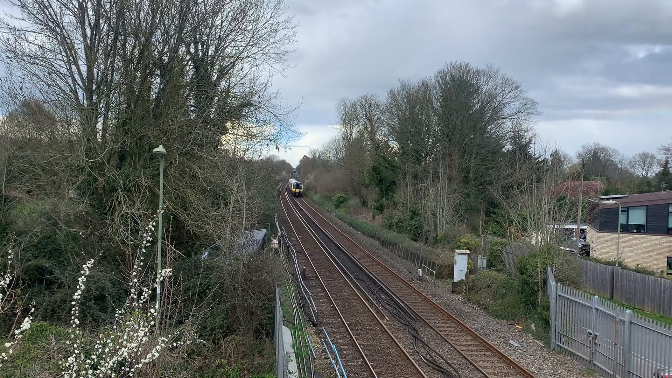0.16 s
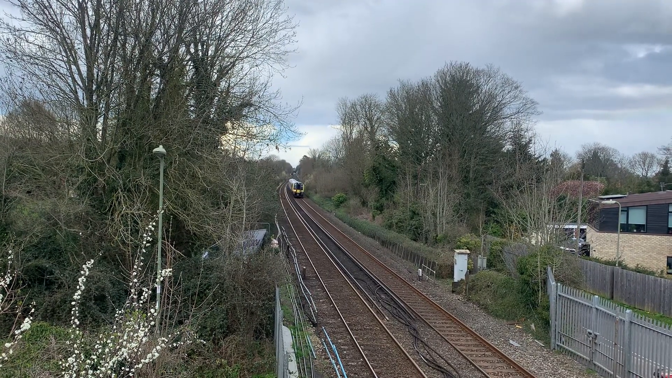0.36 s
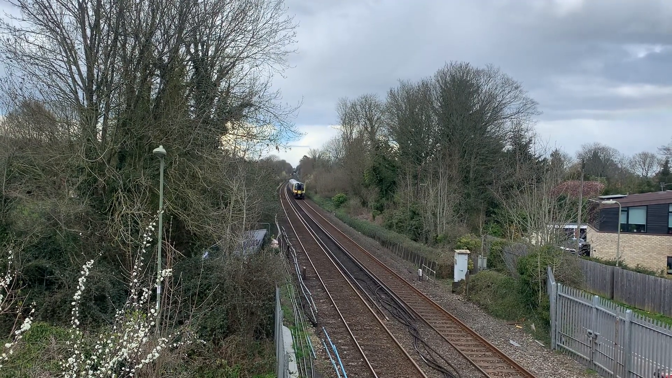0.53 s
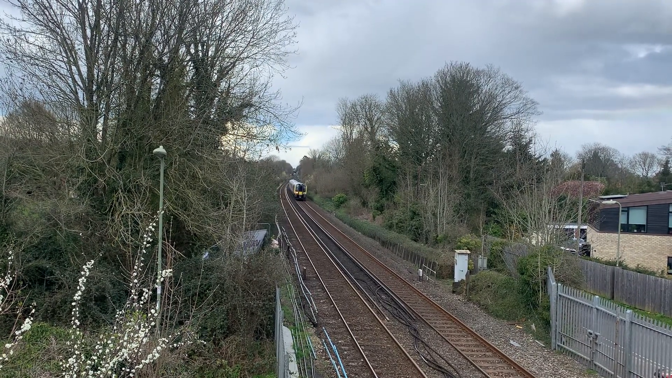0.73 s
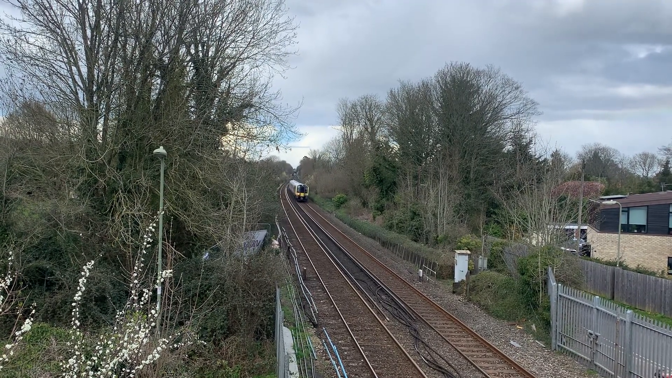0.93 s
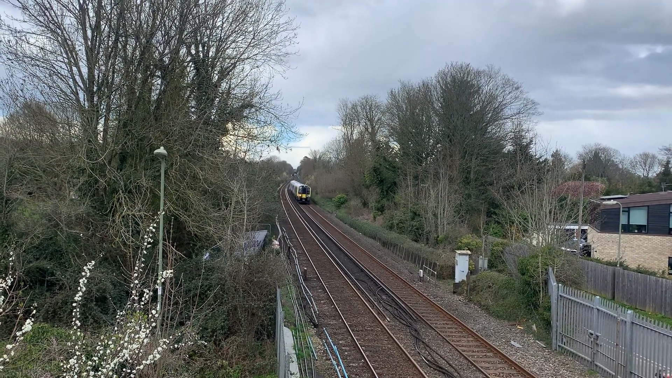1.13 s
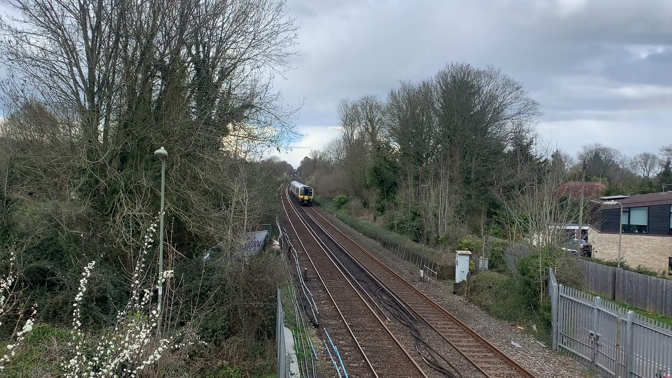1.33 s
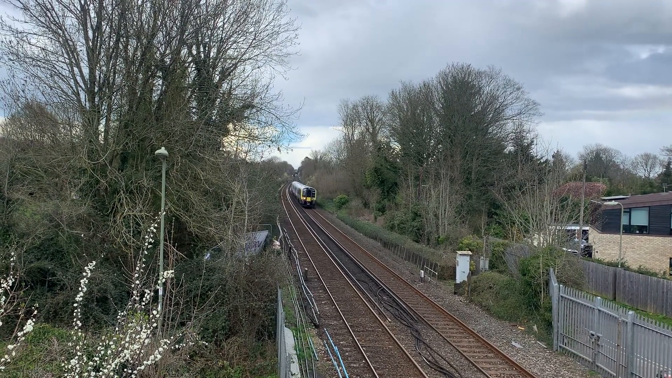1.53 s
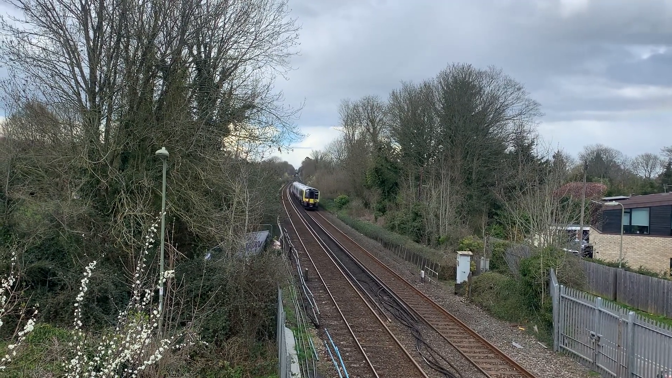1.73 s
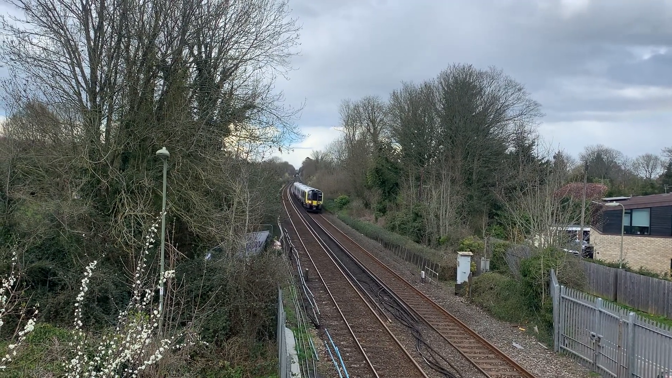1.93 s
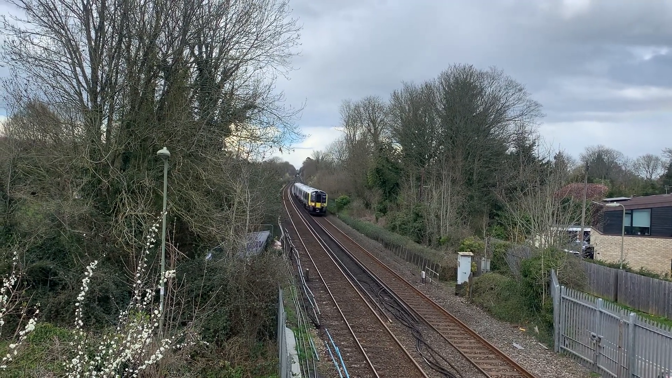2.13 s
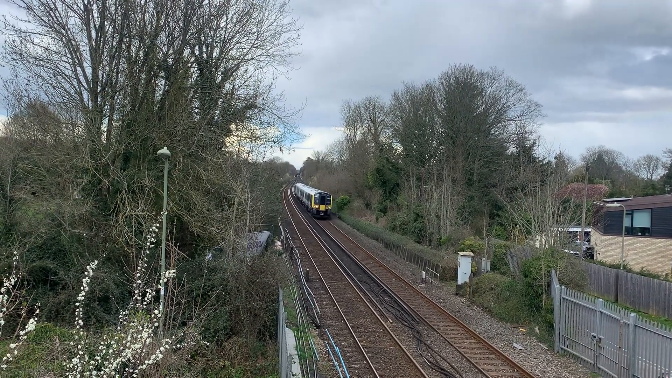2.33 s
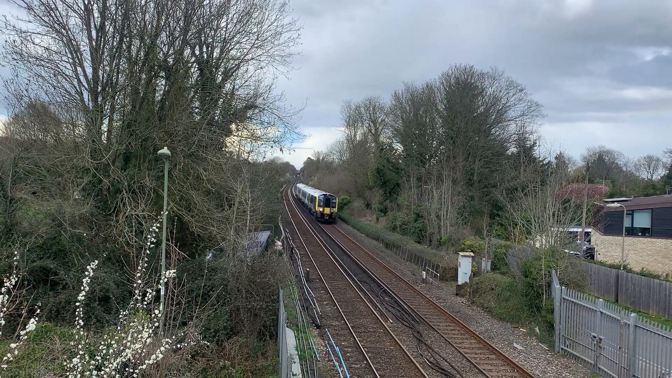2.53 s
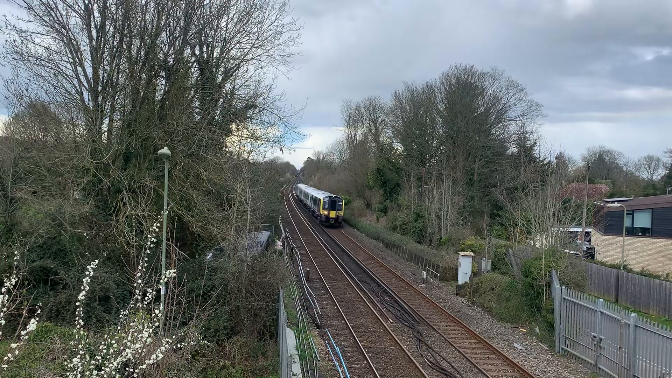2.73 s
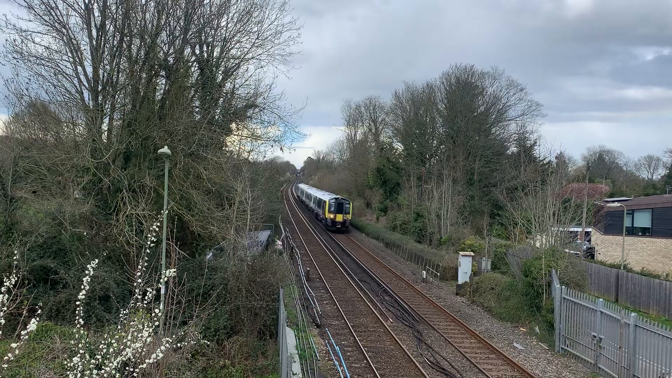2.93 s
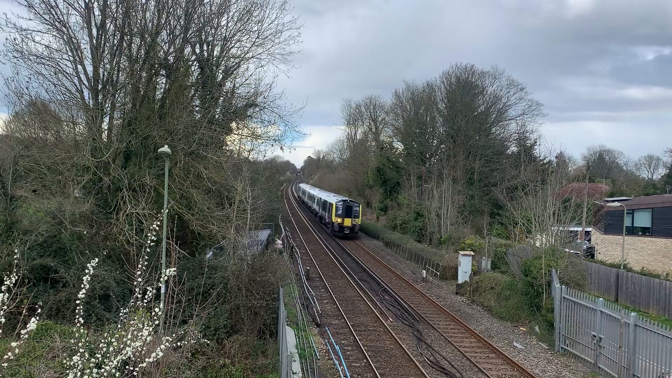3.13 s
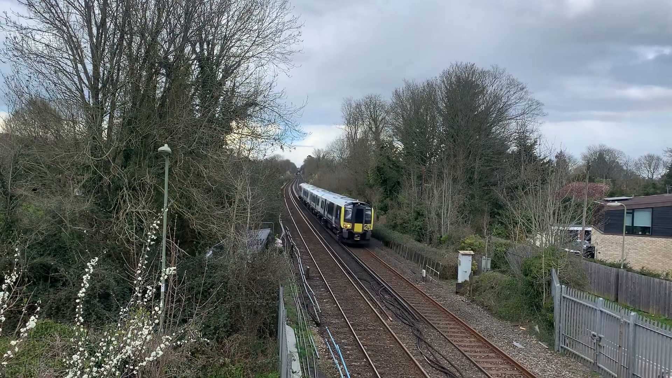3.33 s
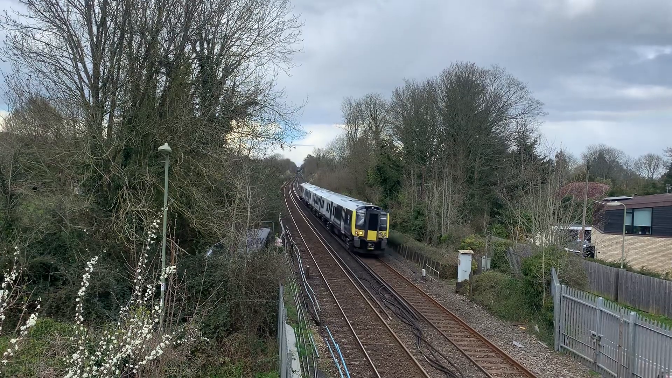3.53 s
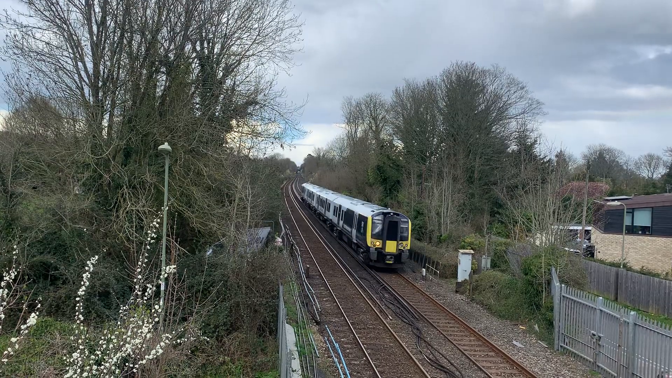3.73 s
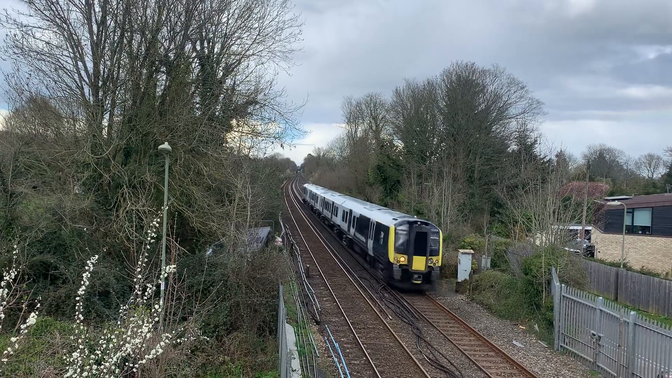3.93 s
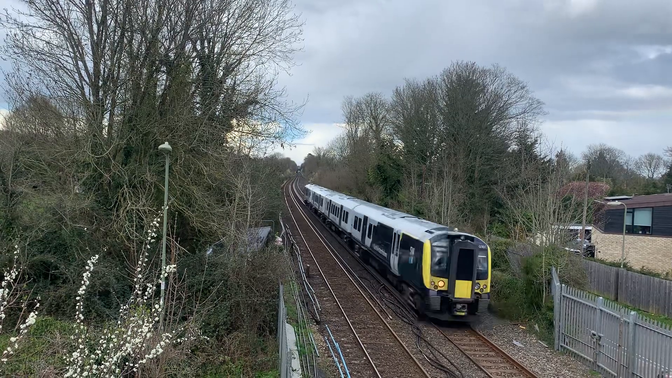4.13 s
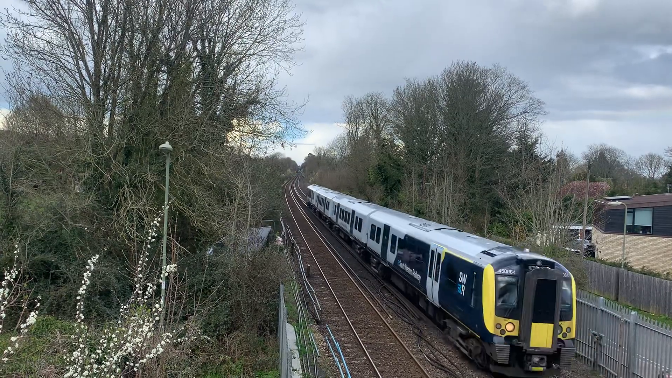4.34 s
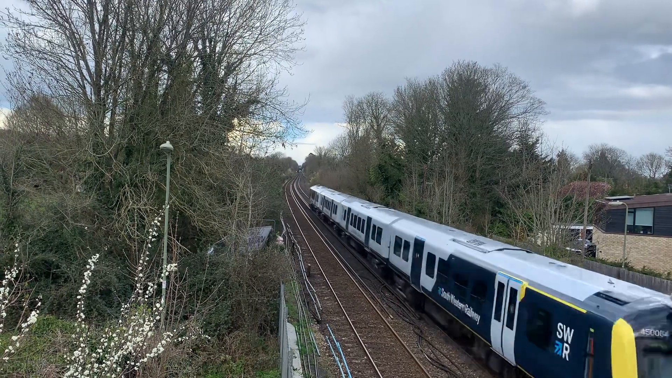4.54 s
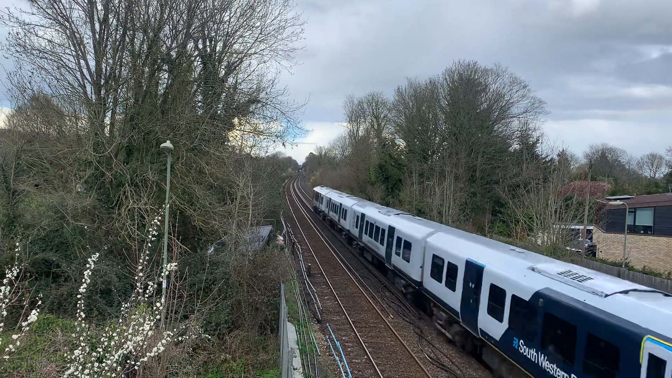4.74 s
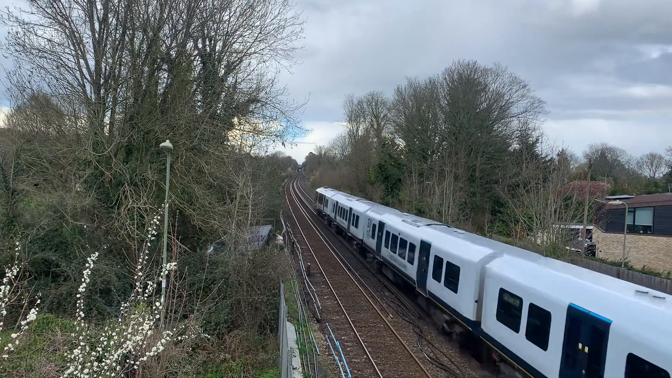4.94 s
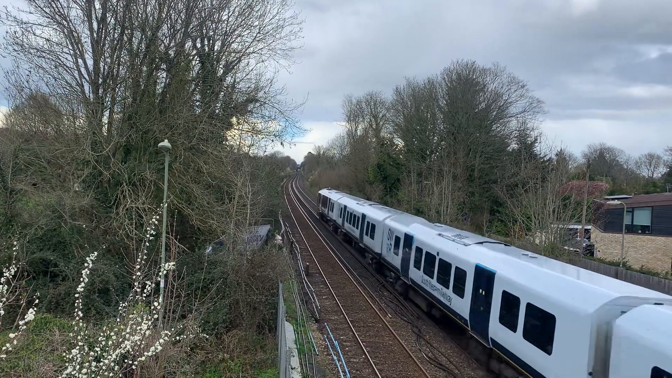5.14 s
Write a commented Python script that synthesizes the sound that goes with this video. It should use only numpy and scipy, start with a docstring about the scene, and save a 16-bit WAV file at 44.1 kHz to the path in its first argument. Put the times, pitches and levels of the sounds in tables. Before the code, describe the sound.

Open air above a railway cutting with trees, heard by a stereo microphone on a footbridge. From 0 s there is a dull low murmur, soft breeze and short low wind thumps. Small birds call faintly from about 0.3 to 1.5 s, a quick two-note trill and a few gliding or rasping chirps with a slight echo from the trees. Underneath, a distant electric train already whines, fuzzy tones around 530, 1080 and 1600 Hz swelling and dipping irregularly, almost fixed in pitch. From 2 to 4 s rolling roar grows, and thin rail singing and bright hiss sharpen. Wind bumps recur near 2.1, 3.3 and 4.9 s. At about 4.5 s the front rushes past with a surge, heavy low rumble and flaring scrape. Ringing wheels slide slightly down in pitch between 4.5 and 5.1 s. Rumble eases a little, but carriages are still roaring by at the 5.3 s cut.

```python
"""An electric train approaches at speed and runs under a microphone on a footbridge.
Rails sing ahead of it as noise combed at the ripple rate; wheels on rippled rail heads whine in fuzzy tones.
Coloured noise, growing with nearness, makes the rumble, roar and hiss; single wheels ring as they pass.
A breeze thumps the microphone in short swings and stirs low noise; small birds call faintly in gliding
notes with an echo from the trees, over a dull, steady outdoor murmur."""
import sys
import numpy as np
from scipy import signal
from scipy.fft import next_fast_len
from scipy.io import wavfile
from scipy.ndimage import uniform_filter1d

SR = 44100
rng = np.random.default_rng(int(sys.argv[2]) if len(sys.argv) > 2 else 0)


def bounce(signal):
    """Save signal as a 16-bit WAV file at the path given by the first command-line argument."""
    frames = np.transpose(np.atleast_2d(signal))
    limited = np.clip(frames, -1, 1)
    pcm = np.round(limited * 32767).astype(np.int16)
    wavfile.write(sys.argv[1], SR, pcm)


N = 232786

# Steady low murmur around the bridge. Each row: frequency in Hz, level in dB per Hz.
BACKGROUND_COLOUR = [(40, -71.5), (130, -67), (200, -73), (320, -75), (480, -87), (1000, -125)]
# Likeness of the two microphone ports. Each row: frequency in Hz, likeness 0-1.
PORT_LIKENESS = [(60, 0.59), (300, 0.99), (600, 0.78), (1000, 1), (1600, 0.16), (2500, 0.028), (5000, 0.2),
                 (7000, 1), (10000, 1), (15000, 0.87)]
# Gusts that stir up low noise. Each row: middle in seconds, length in seconds, level in dB, middle in Hz.
GUST_SWELLS = [(0.13, 0.24, -43, 141), (0.79, 0.075, -36.5, 69), (1.865, 0.15, -36.5, 60),
               (2.897, 0.1, -30.5, 75), (3.258, 0.3, -39.5, 285), (3.76, 0.34, -28.5, 79)]
# Puffs on the microphone. Each row: middle in seconds, level in dB, pitch in Hz, length in seconds.
MIC_PUFFS = [(0.957, -26, 76, 0.0039), (0.99, -23.5, 70.4, 0.0069), (1.533, -23.5, 77, 0.011),
             (2.116, -23.5, 62, 0.019), (2.139, -25.5, 293, 0.002), (2.143, -18.5, 179, 0.0034),
             (2.151, -19, 89.5, 0.0067), (2.408, -28, 89, 0.01), (3.256, -15.5, 84, 0.0044),
             (4.869, -13, 145, 0.0073)]
# Single bird notes. Each row: start in seconds, length in seconds, start in Hz, end in Hz, level in dB,
# rasp 0-1.
BIRD_NOTES = [(0.31, 0.036, 4650, 4950, -57, .4), (0.336, 0.062, 5030, 5130, -51, .4),
              (.425, .045, 4200, 3900, -54, .7), (0.675, 0.03, 3450, 3300, -53, .5),
              (.875, 0.05, 3200, 3080, -58, .3), (1.165, 0.06, 4430, 4300, -54, .6),
              (1.308, .035, 4480, 4140, -55, .8), (1.335, 0.043, 4350, 4630, -51, 1),
              (1.35, 0.18, 2750, 2500, -50, 0), (1.48, .055, 4150, 4180, -53, 0.6)]
# A repeated pair of slurs, one up and one down. Each row: delay in seconds, start in Hz, end in Hz,
# level in dB before fade and scatter.
TRILL_PAIR = [(0, 4480, 4820, -52.5), (0.019, 3860, 3640, -54.5)]

# Rate at which the wheels cross the ripples of the rail head. Each row: time in seconds, rate in Hz.
RIPPLE_RATE = [(0, 526.5), (1.8, 529.3), (3.3, 531.5), (4.5, 533.5), (5.28, 532)]
# Singing of the rails. Each row: frequency in Hz, level beside the train in dB per Hz before comb and trims,
# loss in dB for each second of travel still to come (negative: stronger from afar).
RAIL_BANDS = [(1790, -95, -4.5), (2630, -67.5, 4), (3660, -57.5, 11.5), (5100, -77, 12), (5700, -64, 14),
              (6800, -67, 6), (7650, -65, 3.5), (8040, -105.5, 25), (9106, -57, 9), (10460, -65.5, 3.5),
              (11100, -65, 12.5), (11080, -70.5, 2), (13200, -67, 3), (14800, -73, -0.6)]
# Rumble of the cars. Each row: frequency in Hz, relative level in dB per Hz.
RUMBLE_SHAPE = [(15, -43), (25, -37), (40, -38), (55, 6), (80, 1), (110, -6), (160, -13.5), (250, -36),
                (500, -18.5), (1500, -83)]
# Scrape of the wheel contacts. Each row: frequency in Hz, relative level in dB per Hz.
HISS_SHAPE = [(1000, 10), (2600, 7), (3600, 2), (4800, 6), (5500, -0.5), (7000, 4), (9500, -7),
              (11500, 0.5), (13500, -23), (15000, 1)]
# Bogies passing below brighten the hiss. Each row: middle in seconds, lift in dB, length in seconds.
BOGIE_FLARES = [(4.197, 2.5, 0.019), (4.646, 5, 0.096), (5.222, 4.5, 0.15)]
# Rolling roar. Each row: frequency in Hz, relative level in dB per Hz from afar, the same close by.
ROAR_SHAPE = [(60, -21, -4), (171, -25, -0.5), (268, -2.5, 1), (335, -8.5, 1), (430, -5.5, 0.5),
              (580, 2.5, -1.5), (930, 1.5, 1), (1107, -2.5, 2.5), (1214, -5.5, -2), (1430, -0.5, -12),
              (1646, -2.5, -4), (1790, -7.5, -13.5), (2036, -3.5, -8.5), (2207, -6.5, -12),
              (3020, -13.5, -26.5), (4700, -17, -18), (6300, -45, -68), (15000, -73, -65)]
# Wheel and rail resonances in the roar. Each row: frequency in Hz, width in Hz, lift in dB from afar,
# lift in dB close by.
ROAR_RESONANCES = [(267, 17.6, 8, 2), (705, 13, 8.5, 0.5), (694, 14, 4, -0.5), (801, 9.4, 4, 6),
                   (1030, 14, 15.5, -5.5), (1553, 8.2, 9.5, 5.5), (1700, 22, -0.5, 4), (1906, 22, 10, 4),
                   (2109, 20, 11, 8), (2273, 8, 7, 18)]
# Slow change in the level of the roar. Each row: time in seconds, lift in dB.
ROAR_LIFT = [(0, 0.5), (.8, 1.5), (1.8, 1)]
# Close by, the middle of the roar leans to the right port. Each row: frequency in Hz, left minus right in dB.
ROAR_LEAN = [(300, 0), (550, -3.5), (800, -4), (1100, 0), (2000, 0)]
# Close by, the roar breaks into brief narrow streaks. Each row: frequency in Hz, depth in dB.
ROAR_STREAKS = [(450, .5), (900, 2.4), (2400, 2.6), (4000, 1)]
# Wheels that ring as they pass below. Each row: middle in seconds, length in seconds, middle pitch in Hz,
# shift to either side as a share of the pitch, level in dB.
WHEEL_RINGS = [(4.5, 0.041, 800, 0.016, -33), (4.755, .12, 2190, 0.032, -31),
               (4.77, 0.078, 1082, .015, -26), (4.926, 0.06, 1040, .03, -26.5),
               (5.08, 0.054, 1534, 0.0064, -32)]

# Low, middle, third and sixth tones of the whine and the whistle of the rails.
# Each row: multiple of the ripple rate, width in Hz, roughness 0-1.
MAIN_TONES = [(1.037, 9.5, 0.45), (2.046, 20, 0.36), (3.018, 4.6, 0.99), (6.025, 35, 0.58),
              (14.04, 22, 0.6)]
# Levels of these five, in the same order. Each row: time in seconds, level in dB.
LOW_LEVEL = [(0.03, -52), (0.2, -51), (0.38, -60), (0.57, -44), (0.75, -66), (0.87, -41), (1.17, -47.5),
             (1.5, -39), (1.67, -51.5), (2.19, -79), (2.37, -40), (2.75, -47.5), (3.06, -34), (3.3, -38),
             (3.69, -40.5), (3.81, -28.5), (4.05, -41), (4.16, -23), (4.24, -20), (4.35, -27.5),
             (4.41, -24), (4.55, -26), (4.65, -16), (4.75, -28.5), (4.84, -23), (5.0, -34.5), (5.09, -22),
             (5.16, -36), (5.28, -34)]
MIDDLE_LEVEL = [(0, -46), (.22, -39.5), (.38, -53), (.5, -45.5), (.78, -37.5), (.88, -52), (1.04, -40),
                (1.22, -35), (1.35, -41), (1.52, -30.5), (1.66, -44), (1.77, -30), (1.92, -30), (2, -41),
                (2.1, -29), (2.47, -46), (2.57, -33.5), (2.68, -35.5), (2.85, -34), (3, -40.5), (3.2, -22),
                (3.36, -39), (3.73, -27), (3.8, -31.5), (3.89, -23.5), (4.04, -39.5), (4.17, -24.5),
                (4.3, -35), (4.41, -25.5), (4.63, -34), (5.03, -46), (5.25, -24.5)]
THIRD_LEVEL = [(0, -54), (.65, -56), (.8, -42), (1.2, -52), (2, -44), (2.2, -60), (2.38, -35), (2.7, -40.5),
               (2.95, -31), (3.17, -44), (3.65, -31), (4.22, -33.5), (4.39, -24.5), (4.55, -24),
               (4.7, -23.5), (4.82, -23.5), (4.93, -35), (5.15, -26), (5.28, -31)]
SIXTH_LEVEL = [(0, -72), (2.75, -67), (3.15, -47), (3.24, -54), (3.33, -49), (3.55, -58), (3.78, -51),
               (3.97, -60), (4.13, -50), (4.4, -59), (4.62, -40.5), (4.75, -50), (4.83, -43), (4.93, -52),
               (5.02, -45), (5.12, -50), (5.28, -44)]
WHISTLE_LEVEL = [(0, -68), (.78, -63), (.88, -54.5), (1.65, -53), (2, -57), (2.3, -59), (3, -56),
                 (5.28, -47.5)]
# Thin tones carried ahead by the rails. Each row: multiple of the ripple rate, width in Hz, trim in dB,
# lag at the left port in ms.
RAIL_TONES = [(4.82, 10, -4, .39), (7.56, 12, -7, .25), (8.637, 14, 0, .21), (9.727, 14, -3.5, .185)]
# Their shared level. Each row: time in seconds, level in dB before the trim.
RAIL_TONE_LEVEL = [(0, -85), (2.6, -70), (3.05, -58.5), (3.4, -57.5), (3.6, -54), (4, -51.5), (4.3, -57),
                   (5.28, -62)]
# Further tones that grow as the train nears. Each row: multiple of the ripple rate, width in Hz,
# level beside the train in dB before fading.
NEARING_TONES = [(4.021, 8.5, -35.5), (4.28, 7.6, -37), (10.84, 17, -48)]

# the front of the train runs in at a steady speed; after arrival the nearest wheels stay this close
ARRIVAL_S, SPEED_M_PER_S, CLOSEST_M = 4.626, 30.7, 8.53
FRAME = 2048  # samples in a noise frame
HOP = FRAME // 4
T = np.arange(N) / SR
HZ = np.fft.rfftfreq(FRAME, 1 / SR)
FRAME_T = np.arange(N // HOP + 3) * HOP / SR


def gain_of(db):
    """Amplitude factor for a level in dB."""
    return 10 ** (np.asarray(db) / 20)


def evened(x):
    """The signal scaled to unit mean power."""
    return x / np.sqrt(np.mean(abs(x) ** 2) + 1e-20)


def curve(rows, t, axis=1):
    """One column of a time table at the times t."""
    rows = np.array(rows)
    return np.interp(t, rows[:, 0], rows[:, axis])


def colour(rows, axis=1):
    """One column of a frequency table at every bin, joined along log frequency."""
    rows = np.array(rows)
    return np.interp(np.log(HZ + 1), np.log(rows[:, 0] + 1), rows[:, axis])


def bump(t, middle, length):
    """A bell-shaped swell in time."""
    return np.exp(-((t - middle) / length) ** 2)


def drift(rate):
    """Slow complex chance of unit power, about rate Hz wide."""
    size = next_fast_len(N)
    spectrum = rng.standard_normal(size) + 1j * rng.standard_normal(size)
    spectrum = spectrum * np.exp(-.5 * (np.fft.fftfreq(size, 1 / SR) / rate) ** 2)
    return evened(np.fft.ifft(spectrum)[:N])


def smoothed_chance(shape, frames, bins):
    """Random patches of unit power, smoothed over time frames and frequency bins."""
    patches = uniform_filter1d(rng.standard_normal(shape), size=frames, axis=0)
    return evened(uniform_filter1d(patches, size=bins, axis=1))


def unit_band(db, band):
    """Shifts each spectrum so that the band (Hz) holds unit power."""
    inside = (HZ >= band[0]) & (HZ <= band[1])
    power = (gain_of(db)[..., inside] ** 2).sum(-1, keepdims=True) * SR / FRAME
    return db - 10 * np.log10(power)


def noise(db, lag_ms, patchy_db):
    """Noise of the given dB per Hz with drifting patches; it reaches the left port lag_ms late."""
    shape = (len(FRAME_T), len(HZ))
    a, b, c, d = rng.standard_normal((4, *shape))
    patches = smoothed_chance(shape, frames=8, bins=24)
    same = np.clip(colour(PORT_LIKENESS), 0, 1)
    right = a + 1j * b
    left = same * right + np.sqrt(1 - same ** 2) * (c + 1j * d)
    left = left * np.exp(-2j * np.pi * HZ * lag_ms / 1000)
    frames = np.array([left, right]) * gain_of(db + patchy_db * patches)
    frames = frames * np.sqrt(1.5 * SR / FRAME)  # makes up for the overlapping windows
    _, sound = signal.istft(frames, nperseg=FRAME, noverlap=FRAME - HOP, time_axis=1, freq_axis=2)
    return sound[:, :N]


def background():
    """Dull, steady outdoor noise."""
    return noise(colour(BACKGROUND_COLOUR), lag_ms=0, patchy_db=3.0)


def gusts(octaves=0.74):
    """Each gust of the breeze is a swell of low noise around its own pitch."""
    power = 1e-20
    for s, length, level_db, hz in GUST_SWELLS:
        band = np.exp(-(np.log2((HZ + 1) / hz) / octaves) ** 2)
        swell = gain_of(level_db) * bump(FRAME_T, s, length)
        power = power + swell[:, None] ** 2 * band / (band.sum() * SR / FRAME)
    return noise(10 * np.log10(power), lag_ms=0, patchy_db=1.0)


def breeze(flutter_db=-17, flutter_hz=280, spread=1.7):
    """Each eddy pushes briefly on the microphone, inside a longer burst of rough flutter."""
    flutter = np.array([drift(flutter_hz).real, drift(flutter_hz).real])  # separate at each port
    flutter = gain_of(flutter_db) * evened(flutter)
    out = np.zeros((2, N))
    for s, db, hz, length in MIC_PUFFS:
        push = bump(T, s, length) * np.cos(2 * np.pi * hz * (T - s))
        out += gain_of(db) * (push + bump(T, s, length * spread) * flutter)
    return out


def trill(count):
    """A small bird's repeated pair, each note a little different, as rows like the single notes."""
    start_s, step_s, note_s, rasp = .405, 0.077, 0.028, .4
    fade_db = .15  # for each pair, before the scatter
    scatter_s, scatter_hz, scatter_db = .002, 35, 1
    notes = []
    for k in range(count):
        for delay, start_hz, end_hz, db in TRILL_PAIR:
            late, high, loud = rng.standard_normal(3)
            start = start_s + k * step_s + delay + scatter_s * late
            off_hz = scatter_hz * high
            level_db = db - k * fade_db + scatter_db * loud
            notes.append((start, note_s, start_hz + off_hz, end_hz + off_hz, level_db, rasp))
    return notes


def birds(echo_db=-3, t60=0.45, rasp_hz=170):
    """Short gliding notes, some pure and some rasping, scattered by the trees."""
    song = np.zeros(N)
    fuzz = drift(rasp_hz)
    for s, length, start_hz, end_hz, db, rasp in list(BIRD_NOTES) + trill(count=6):
        u = np.clip((T - s) / length, 0, 1)  # progress through the note
        rasp = np.clip(rasp, 0, 1)
        note = np.exp(2j * np.pi * np.cumsum(start_hz + (end_hz - start_hz) * u) / SR)
        voice = (note * (np.sqrt(1 - rasp) + np.sqrt(rasp) * fuzz)).real
        song += gain_of(db) * np.sin(np.pi * u) * voice
    t = T[:SR // 2]
    trees = rng.standard_normal((2, len(t))) * gain_of(-60 * t / t60)
    trees = trees / np.linalg.norm(trees[0])
    echo = signal.fftconvolve(song[None], trees, axes=1)[:, :N]
    return song + gain_of(echo_db) * echo


def distance(t):
    """Metres from the microphone to the nearest wheels."""
    return np.hypot(SPEED_M_PER_S * np.maximum(ARRIVAL_S - t, 0), CLOSEST_M)


def approach(t, beside_db, loss_db_per_m):
    """Level of a long source: power falls as one over distance, and ground and air take their share."""
    metres = distance(t)
    return beside_db - 10 * np.log10(metres / CLOSEST_M) - loss_db_per_m * (metres - CLOSEST_M)


def rail_song():
    """Fuzzy harmonics of the ripple rate run ahead along the steel, each band with its own loss."""
    to_come = np.maximum(ARRIVAL_S - FRAME_T, 0)[:, None]
    ripple_hz = curve(RIPPLE_RATE, FRAME_T)[:, None]
    off_hz = (HZ + ripple_hz / 2) % ripple_hz - ripple_hz / 2  # from the nearest harmonic
    comb = 1 / (1 + (off_hz / 42) ** 2) ** 3.15 + gain_of(-27.5)
    db = colour(RAIL_BANDS, axis=1) - to_come * colour(RAIL_BANDS, axis=2) + 10 * np.log10(comb)
    passing_db = np.interp(T, [4.2, 4.8], [.5, -3])
    return noise(db, lag_ms=0.18, patchy_db=1.5) * gain_of(passing_db + 0.51 * drift(22).real)


def rumble():
    """Lumpy low noise from the cars, easing once the front of the train has gone by."""
    db = unit_band(colour(RUMBLE_SHAPE), (30, 160))
    ease_db = 11.5 * np.maximum(T - ARRIVAL_S, 0)  # 11.5 dB per second
    level_db = approach(T, beside_db=-22.5, loss_db_per_m=0.11) - ease_db
    return noise(db, lag_ms=0, patchy_db=1.0) * gain_of(level_db)


def hiss():
    """The bright scrape of the wheel contacts, fluttering at random and flaring as each bogie passes."""
    db = unit_band(colour(HISS_SHAPE), (5400, 6700))
    flutter_db = 1.9 * drift(30).real
    bogie_db = sum(lift_db * bump(T, s, length) for s, lift_db, length in BOGIE_FLARES)
    port_db = np.array([[-1.2], [-.3]])  # left, right
    level_db = approach(T, beside_db=-41, loss_db_per_m=0.16) + bogie_db + flutter_db + port_db
    return noise(db, lag_ms=0.1784, patchy_db=3.0) * gain_of(level_db)


def roar(fill=0.49):
    """Rolling noise through wheel and rail resonances; its colour fills out as the train nears."""
    near = (CLOSEST_M / distance(FRAME_T))[:, None] ** fill  # 1 when closest
    db = (1 - near) * colour(ROAR_SHAPE, axis=1) + near * colour(ROAR_SHAPE, axis=2)
    for hz, width, far_db, near_db in ROAR_RESONANCES:
        lift_db = (1 - near) * far_db + near * near_db
        db = db + lift_db / (1 + ((HZ - hz) / width) ** 2)
    db = unit_band(db, (620, 980))
    db = db + np.array([.5, -.5])[:, None, None] * near * colour(ROAR_LEAN)
    streaks = smoothed_chance(db.shape[1:], frames=10, bins=3)
    db = db + colour(ROAR_STREAKS) * near * streaks
    surge_db = 2.6 * bump(T, 4.53, 0.067)  # a brief surge of the roar
    level_db = approach(T, beside_db=-28, loss_db_per_m=0.065) + curve(ROAR_LIFT, T) + surge_db
    return noise(db, lag_ms=0.27, patchy_db=1.5) * gain_of(level_db)


def passing_rings(rough=0.46, width_hz=22, lag_ms=0.26):
    """A ringing wheel swells as it nears, and its pitch slides down as it goes by."""
    out = np.zeros((2, N))
    for s, length, hz, fall, db in WHEEL_RINGS:
        u = (T - s) / length
        late = hz * np.array([[lag_ms / 1000], [0]])  # in turns, at the left port
        turns = np.cumsum(hz * (1 - fall * np.tanh(u))) / SR - late
        line = evened(1 + rough * drift(width_hz)) * np.exp(2j * np.pi * turns)
        out += np.sqrt(2) * gain_of(db) * np.exp(-u ** 2 / 2) * line.real
    return out


def tone(multiple, width, level_db, lag_ms=0.31, rough=0.87):
    """A wavering line with a narrow fuzz from the many wheels around it."""
    turns = np.cumsum(curve(RIPPLE_RATE, T)) / SR
    waver = np.cumsum(2.65 * drift(4.38).real) / SR
    shared_fuzz = drift(width * 2)
    port_fuzz = np.array([drift(width), drift(width)])
    line = evened(1 + rough * (shared_fuzz + 0.58 * port_fuzz)) * gain_of(level_db)
    late = np.array([[lag_ms / 1000], [0]]) * RIPPLE_RATE[0][1]  # in ripples, at the left port
    return np.sqrt(2) * (line * np.exp(2j * np.pi * (multiple * (turns - late) + waver))).real


def whine():
    """Main tones swell and fade as the paths from the wheels change; overtones fade in and out by chance."""
    out = np.zeros((2, N))
    main_levels = (LOW_LEVEL, MIDDLE_LEVEL, THIRD_LEVEL, SIXTH_LEVEL, WHISTLE_LEVEL)
    for (multiple, width, rough), levels in zip(MAIN_TONES, main_levels):
        out += tone(multiple, width, curve(levels, T), rough=rough)
    for multiple, width, trim_db, lag_ms in RAIL_TONES:
        out += tone(multiple, width, curve(RAIL_TONE_LEVEL, T) + trim_db, lag_ms=lag_ms)
    for multiple, width, beside_db in NEARING_TONES:
        fading_db = 4 * drift(8.4).real
        out += tone(multiple, width, approach(T, beside_db, loss_db_per_m=0.25) + fading_db)
    return out


def scene():
    """Everything that reaches the microphone on the footbridge."""
    surroundings = background() + gusts() + breeze() + birds()
    rolling = rumble() + hiss() + roar()
    return surroundings + rolling + rail_song() + passing_rings() + whine()


def record(dry, low_cut_hz=30, edge_hz=15150):
    """The recorder's low cut and band limit."""
    low_cut = signal.butter(3, low_cut_hz, "highpass", fs=SR, output="sos")
    dry = signal.sosfilt(low_cut, dry)
    band_limit = signal.firwin(511, edge_hz, window=("kaiser", 9), fs=SR)
    return signal.oaconvolve(dry, band_limit[None], "same")


dry = scene()
out = record(dry)
bounce(out)
```